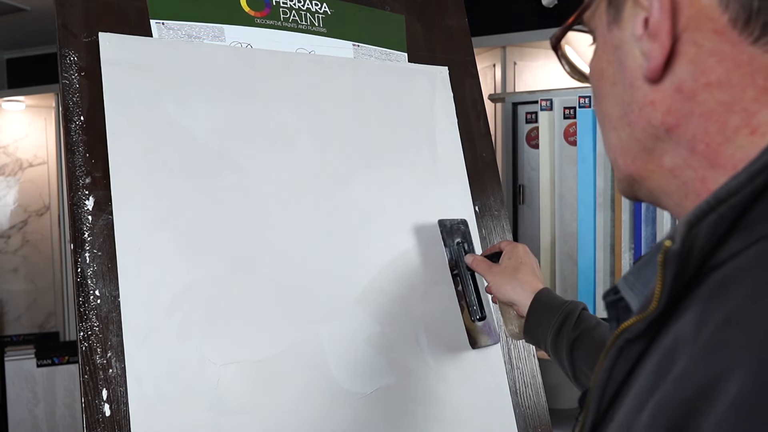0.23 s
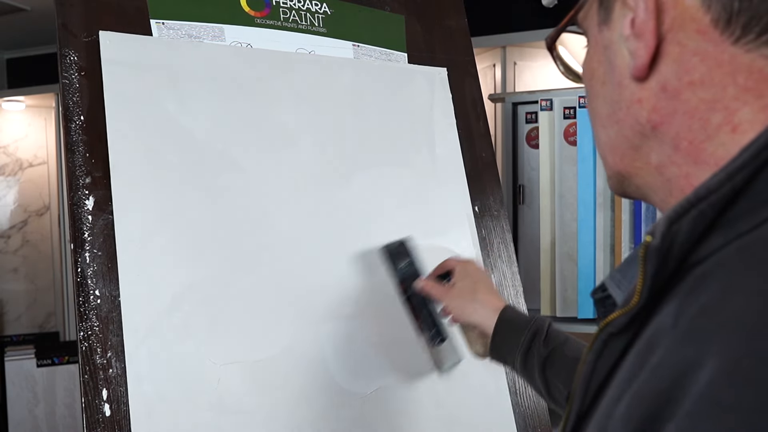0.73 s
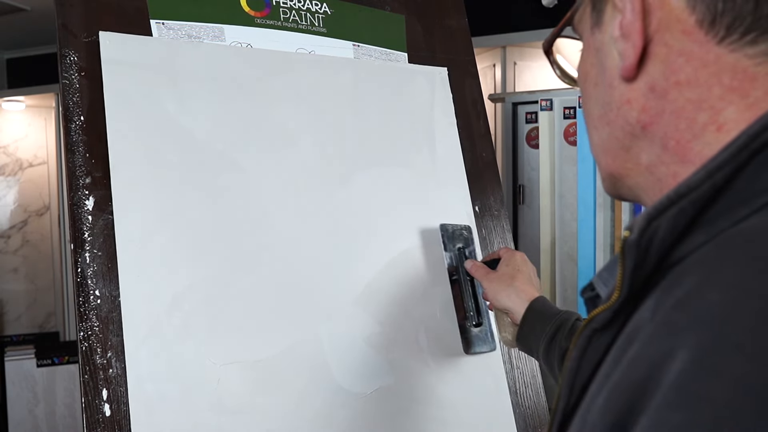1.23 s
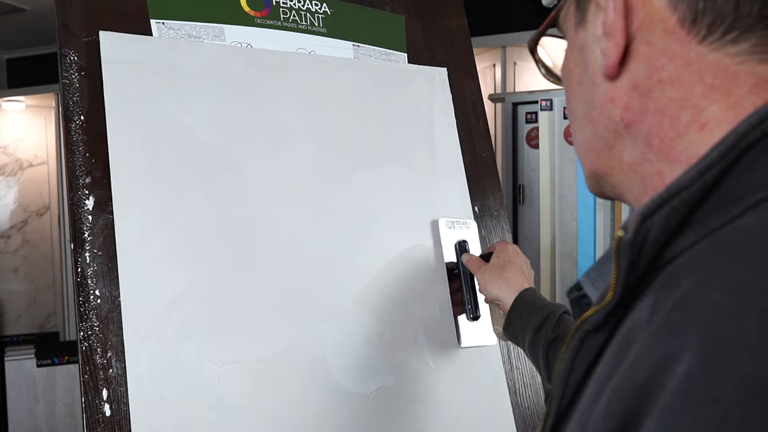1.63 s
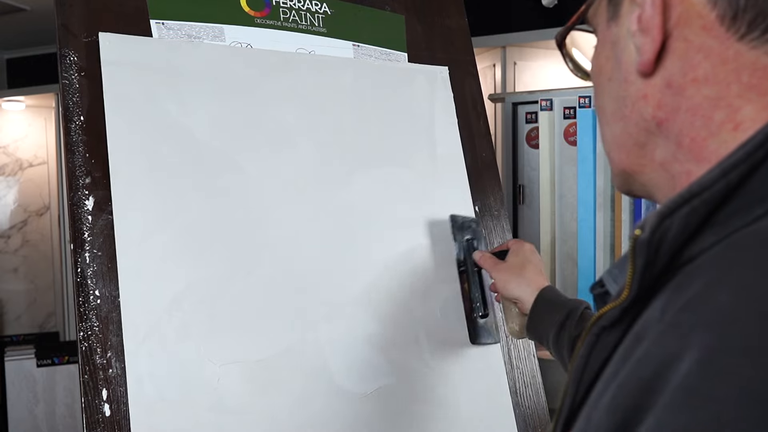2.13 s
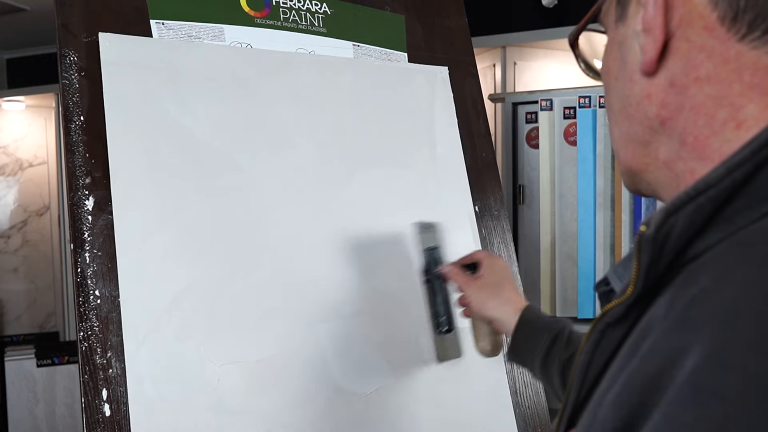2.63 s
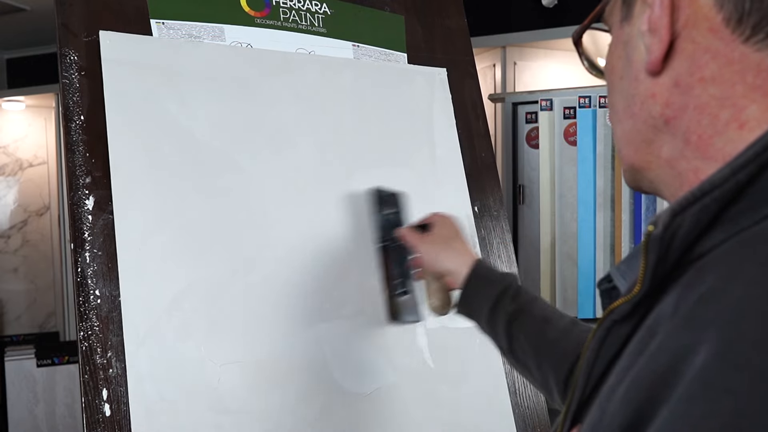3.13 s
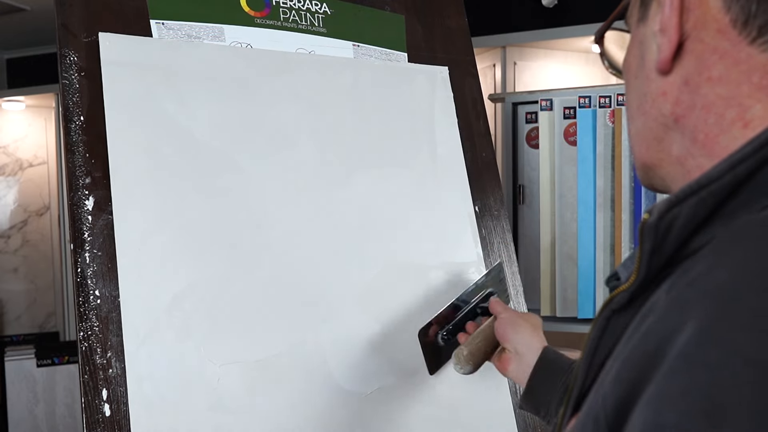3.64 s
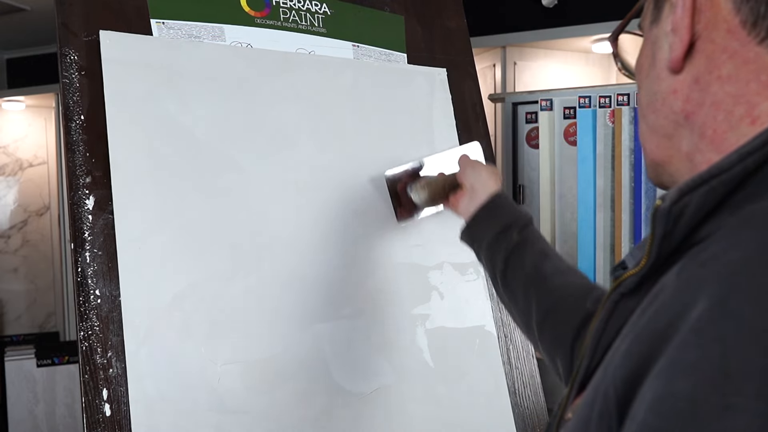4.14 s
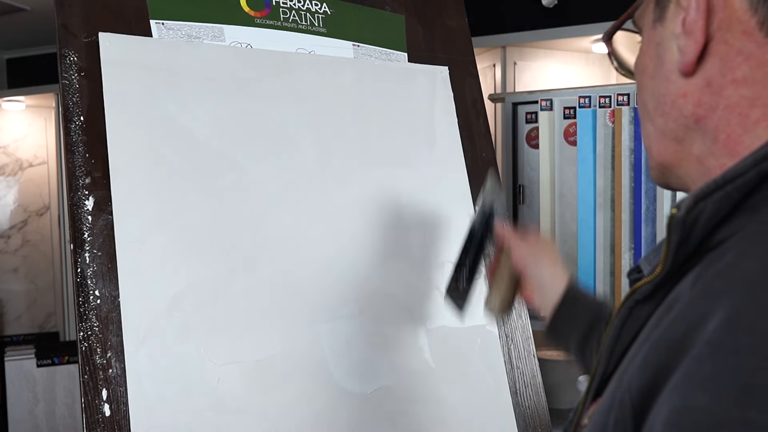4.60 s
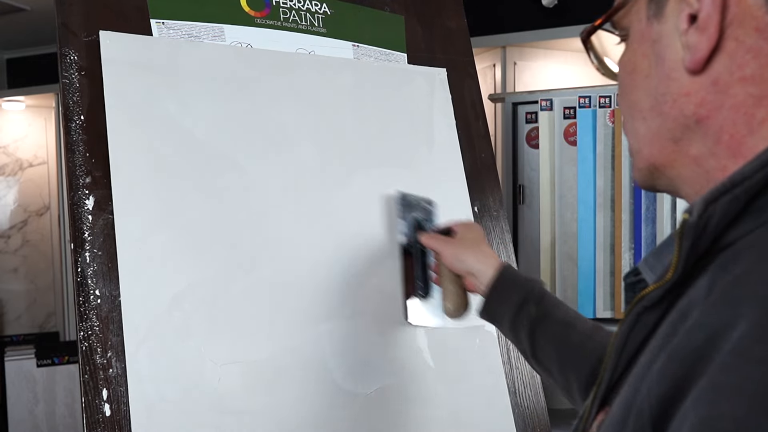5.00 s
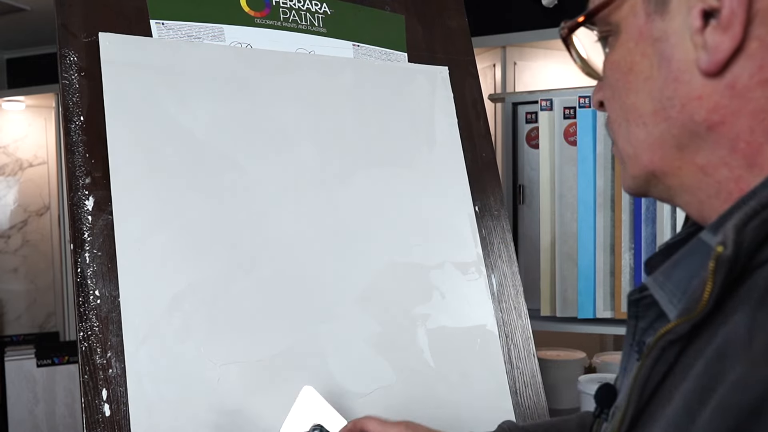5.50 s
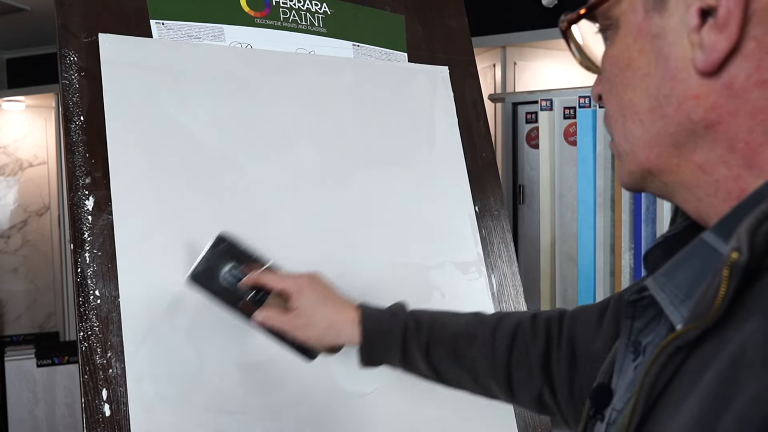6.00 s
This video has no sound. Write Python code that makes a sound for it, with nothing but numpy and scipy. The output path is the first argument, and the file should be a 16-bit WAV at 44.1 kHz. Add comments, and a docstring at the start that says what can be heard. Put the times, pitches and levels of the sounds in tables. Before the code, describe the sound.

Short gritty scrapes and soft hissing slides of a metal trowel spreading paint on a board, with small taps between strokes.

```python
"""A small, quiet workroom: a steel trowel spreads a thin coat of paint over a board on an easel.
The blade lands with a clack, hisses over wet paint and drags dully on the board. Where its edge
bites into the coat it sticks and slips in a gritty rasp. Tacky paint snaps off it in tiny ticks,
and once it slips off the board and rings. Strokes leave a short room tail over a low rumble."""
import sys
import numpy as np
from scipy import signal
from scipy.fft import rfft, irfft
from scipy.io import wavfile

SR = 44100
rng = np.random.default_rng(int(sys.argv[2]) if len(sys.argv) > 2 else 0)


def inscribe(sig):
    """Save sig as 16-bit PCM at rate SR to the path in sys.argv[1].

    A 1-D sig is mono; a 2-D sig holds one channel per row.
    Samples are clipped to [-1, 1] before scaling.
    """
    pcm = np.round(np.clip(np.atleast_2d(sig).T, -1, 1) * 32767)
    wavfile.write(sys.argv[1], SR, pcm.astype(np.int16))


N = 275889

# tone of the heavy board rocking on its easel: (frequency [Hz], level [dB])
ROCKING_TONE = [(20, -10), (45, 1), (100, -9), (200, -16.5), (400, -14), (650, -14), (2000, -35.5)]
# resonances of the board on its easel: (frequency [Hz], width [Hz], boost [dB])
ROCKING_MODES = [(48.5, 8.3, 3.5), (79, 16, 6), (142.9, 34, 4), (356, 33, 3.5)]


def from_db(db):
    """Decibels to gain."""
    return 10 ** (np.asarray(db) / 20)


def rms_one(x):
    """Scale to rms 1."""
    return x / np.sqrt(np.mean(x ** 2) + 1e-20)


def at_hz(points, hz):
    """Read a curve on a log-frequency axis."""
    points = np.array(points)
    return np.interp(np.log(np.maximum(hz, 1)), np.log(points[:, 0]), points[:, 1])


def drift(rate_hz):
    """Random modulator, gliding to a new value rate_hz times a second."""
    knots = rng.standard_normal(N // 10)
    return np.interp(np.arange(N) / SR * rate_hz, np.arange(len(knots)), knots)


def colour(x, tone, peaks=(), size=4096):
    """Minimum-phase EQ of unit power gain: a tone curve plus resonant peaks."""
    hz = np.fft.rfftfreq(size, 1 / SR)
    peaks_db = sum(db / (1 + (2 * (hz - f) / width) ** 2) for f, width, db in peaks)
    cepstrum = irfft(np.log(from_db(at_hz(tone, hz) + peaks_db)))
    cepstrum[size // 2:] = 0
    response = irfft(np.exp(2 * rfft(cepstrum) - cepstrum[0]))
    return signal.fftconvolve(x, response / np.linalg.norm(response))[:len(x)]


def add(track, sound, at_s):
    """Mix a sound in at a time."""
    start = int(at_s * SR)
    track[start:start + len(sound)] += sound[:N - start]


def room_tone(air_db=-51, hum_db=-56.5, mains_hz=50):
    """A steady bed of low rumble, faint hiss and mains hum."""
    # rumble and hiss of the room: (frequency [Hz], level [dB])
    air_tone = [(12, -22), (20, 7), (60, -11.5), (210, -10), (328, -22.5), (422, -21), (542, -20.5),
                (607, -25.5), (849, -22), (949, -28.5), (1370, -25), (3250, -34.5), (3530, -38.5),
                (3840, -37), (16000, -44.5)]
    air = colour(rng.standard_normal(N + SR), air_tone)[SR:]
    hum = np.sqrt(2) * np.sin(2 * np.pi * mains_hz * np.arange(N) / SR)
    return from_db(air_db) * air + from_db(hum_db) * hum


def ringing(modes, count, favoured_db=0, scatter_db=3.5):
    """Struck modes die away, each blow sharing its force among them a little differently."""
    hz, mode_db, t60 = np.transpose(modes)
    t = np.arange(count) / SR
    gains = from_db(mode_db + favoured_db + rng.normal(0, scatter_db, len(hz)))
    gains *= rng.choice([-1, 1], len(hz))
    decays = np.exp(-np.log(1000) * np.outer(1 / t60, t))
    return gains @ (np.sin(2 * np.pi * np.outer(hz, t)) * decays)


def landings(clack_trim_db=-8.5, crack_trim_db=-3.0, crack_s=0.0046, thump_s=0.024):
    """Steel meets board, and once the stand knocks: a bright crack, a dense clack, a few ringing modes and a
    low thump."""
    # blade hits, and at 3.748 s a knock of the stand: (time [s], force [dB], clack focus [Hz], clack decay [s],
    # crack before trim [dB],
    hits = [(0.2022, -19.5, 2420, 0.012, -27.5, 600, -23.5), (0.494, -43, 1570, 0.0051, -75, 930, -49.5),
            (1.06, -29.5, 1920, 0.0046, -60, 1030, -47.5), (1.307, -59, 1100, .005, -70, 447, -55),
            (2.16, -23, 2090, 0.0048, -66, 880, -42), (2.18, -20, 1840, .0032, -46, 456, -36),
            (2.205, -32, 1650, 0.0021, -61, 960, -33), (2.306, -32.5, 2290, 0.0052, -39, 719, -43),
            (2.717, -37, 2050, 0.0077, -53, 441, -74), (2.873, -16, 1710, 0.0069, -34.5, 744, -31),
            (3.703, -9.5, 1930, 0.0024, -26, 920, -22), (3.742, -6.5, 2210, 0.0021, -23.5, 400, -30.5),
            (3.748, -21, 1530, 0.0076, -29, 390, -20), (4.403, -27.5, 1370, 0.0015, -53, 746, -35),
            (4.786, -13, 1390, 0.0058, -23.5, 1050, -21), (4.792, -16.5, 1600, 0.0037, -27, 1090, -29),
            (5.76, -9, 1330, .01, -24, 915, -31), (5.785, -15, 1610, 0.0039, -21.5, 1100, -19),
            (5.792, -13.5, 1600, 0.0054, -23, 980, -39)]
    # the board's crowd of quickly damped modes: (frequency [Hz], level [dB])
    clack_tone = [(150, -38.5), (330, -5), (580, -6.5), (750, -29.5), (1100, -5.5), (1600, 7), (2200, 8.5),
                  (2700, -1), (3500, -11.5), (6000, -34)]
    # the board's ringing modes: (frequency [Hz], level [dB], t60 [s])
    board_modes = [(415, -11.5, 0.044), (723, -6, 0.094), (948, 2, 0.043), (1140, -3.5, 0.083),
                   (1180, 6.5, 0.029), (1396, -4, 0.12), (1587, -12.5, 0.075), (2046, -9, 0.14),
                   (2320, 15, 0.0074), (2430, 6.5, 0.01), (3250, -18, 0.046)]
    # steel on a hard coat: (frequency [Hz], level [dB])
    crack_tone = [(500, -46.5), (2000, 14), (3500, 9), (5000, 3.5), (7000, 3), (10000, -2), (15000, -11)]
    firm_force_db, firm_thump_db, hand_weight_db = -10.5, -33.0, -44.5
    out, t = np.zeros(N), np.arange(SR // 2) / SR
    mode_hz = np.transpose(board_modes)[0]
    for at_s, force_db, clack_hz, clack_s, crack_db, ring_hz, ring_db in hits:
        decays = np.exp(-t / np.array([[clack_s], [crack_s], [thump_s]]))
        clack_burst, crack_burst, thump_burst = rng.choice([-1, 1], decays.shape) * decays
        # where the blow falls decides which resonances speak
        clack = colour(clack_burst, clack_tone, peaks=[(clack_hz, 350, 10.0)])
        focus_db = 10.5 * np.exp(-(np.log2(mode_hz / ring_hz) / 0.29) ** 2)
        ring = ringing(board_modes, len(t), favoured_db=focus_db)
        crack = colour(crack_burst, crack_tone)
        layers = (clack, force_db + clack_trim_db), (ring, ring_db), (crack, crack_db + crack_trim_db)
        for layer, db in layers:
            add(out, layer / np.std(layer[:SR // 200]) * from_db(db), at_s)  # level of the first 5 ms
        # even the lightest touch thumps with the weight of the hand
        thump_db = max(firm_thump_db + 1.05 * (force_db - firm_force_db), hand_weight_db)
        add(out, colour(thump_burst, ROCKING_TONE, ROCKING_MODES) * from_db(thump_db), at_s)
    return out


def reflections(build_s=0.0014):
    """Diffuse echoes of one spot in the room build up and die away, sooner in the treble."""
    # room decay: (frequency [Hz], t60 [s])
    decay_times = [(200, 1), (1600, 0.58), (6000, 0.61), (9000, 0.32), (15000, 0.34)]
    # colour of the echoes: (frequency [Hz], level [dB])
    echo_tone = [(300, 3.0), (1800, -4.0), (3500, -2.5), (7000, 7.5), (14000, -4.5)]
    t, edges = np.arange(SR) / SR, np.geomspace(80, 18000, 11)
    white, tail = rng.standard_normal((2, SR)), 0
    for k, (low, high) in enumerate(zip(edges, edges[1:])):
        band = signal.sosfilt(signal.butter(2, [low, high], "band", fs=SR, output="sos"), white[k % 2])
        hz = np.sqrt(low * high)
        decay = np.exp(-np.log(1000) * t / at_hz(decay_times, hz))
        tail += from_db(at_hz(echo_tone, hz)) * band * decay
    tail *= 1 - np.exp(-(t / build_s) ** 2)
    return tail / np.linalg.norm(tail)


def room_tail(x, wet_db=-8.0, travel_hz=1.7):
    """Two echo patterns crossfade as the trowel travels over the board."""
    place = 2 * np.pi * travel_hz * np.arange(N) / SR
    sends = x * np.cos(place), x * np.sin(place)
    return from_db(wet_db) * sum(signal.fftconvolve(send, reflections())[:N] for send in sends)


def paint_ticks(trim_db=-3.5, decay_s=0.0013):
    """Tacky paint snaps off the blade's edge in tiny bright ticks, and the first landing carries a bright tick
    of its own."""
    # snaps of paint, and at 0.203 s the first landing's bright tick: (time [s], level before trim [dB])
    snaps = [(0.203, -26), (0.9504, -43), (1.1174, -53), (1.5254, -33), (2.719, -39.5), (3.479, -44),
             (4.4007, -25), (4.4054, -19.5)]
    out, t = np.zeros(N), np.arange(SR // 20) / SR
    for at_s, db in snaps:
        add(out, rng.standard_normal(len(t)) * np.exp(-t / decay_s) * from_db(db + trim_db), at_s)
    return colour(out, tone=[(2000, -18.0), (6000, -2.5), (11000, 4), (16000, 6)])


def push(start, length, swell_db, attack_s, release_s):
    """Envelope of one push of the hand: it builds, swells or sags evenly, then lets go."""
    t = np.arange(N) / SR - start
    flanks = np.minimum(t, 0) / attack_s - np.maximum(t - length, 0) / release_s
    return from_db(swell_db * (np.clip(t / length, 0, 1) - .5)) * np.exp(np.maximum(flanks, -20))


def strokes(tremor_db=.8, tremor_hz=35):
    """Glides and bites sum to level curves for rasp, drag, hiss and grit, and the rasp's pitch."""
    # the flat blade slides on wet paint: (start [s], length [s], hiss [dB], drag [dB], swell [dB])
    glides = [(0.335, 0.048, -67, -80, -6), (0.472, 0.011, -69, -66, -3), (0.635, 0.054, -52, -63, 18),
              (0.682, 0.1, -40.5, -37, 16), (1.202, .27, -57, -62.5, -5), (1.511, 0.027, -52.5, -53, 2),
              (1.56, 0.094, -64, -63, 3), (1.697, 0.17, -40, -47.5, 9), (2.291, 0.12, -40, -43, 12.5),
              (2.413, 0.047, -41, -47, 2), (2.468, .016, -29.5, -33, -11), (2.951, 0.19, -46.5, -44, 4),
              (3.159, 0.087, -36.5, -53, 0), (3.802, 0.44, -50, -40, -6), (4.234, 0.11, -48, -34, 9),
              (4.563, 0.1, -65, -70, 0), (4.85, 0.45, -47, -50, -6.5), (5.497, 0.0096, -62, -56, -1),
              (5.583, 0.018, -66.5, -75, 0), (5.81, 0.19, -46.5, -37.5, -8), (5.996, 0.24, -54, -49, 2)]
    # the tilted edge bites: (start [s], length [s], rasp [dB], swell [dB], attack [s], pitch [Hz],
    # grit relative to rasp [dB])
    bites = [(0.708, 0.081, -21, 4.5, 0.013, 1890, -15), (1.202, 0.11, -61.5, -1, 0.014, 2430, -2),
             (1.77, 0.03, -24, 9, 0.0043, 2060, -17), (1.841, 0.029, -20, 0.5, 0.023, 1670, -15.5),
             (2.378, 0.029, -35.5, 6.5, 0.014, 2160, -7), (2.472, 0.045, -21.5, -5.5, 0.0087, 1880, -12.5),
             (2.998, 0.029, -28, 2, 0.011, 2110, -22), (3.047, 0.13, -26.5, 7, 0.01, 2000, -38),
             (3.185, 0.076, -19.5, -0.5, .026, 1900, -16), (3.265, 0.074, -31, -7, .01, 1900, -13.5),
             (3.878, 0.026, -37, 8, 0.014, 2200, -18), (3.951, 0.039, -36.5, 2, 0.014, 2150, -22),
             (4.249, 0.081, -36, 15, 0.012, 2000, -17), (4.883, 0.033, -32.5, 1, 0.014, 1840, -22),
             (4.958, 0.16, -32, 10.5, .018, 1870, -17), (5.12, 0.11, -19.5, 2, 0.031, 2130, -16),
             (5.567, 0.085, -67.5, 4, .015, 2100, -22), (5.862, 0.11, -25, 4.5, 0.022, 1650, -14),
             (5.997, 0.24, -36.5, -3.5, 0.016, 1730, -37)]
    rasp = drag = hiss = grit = weighted_pitch = 0
    for start, length, hiss_db, drag_db, swell_db in glides:
        envelope = push(start, length, swell_db, attack_s=0.011, release_s=0.012)
        hiss += (envelope * from_db(hiss_db)) ** 2
        drag += (envelope * from_db(drag_db)) ** 2
    for start, length, rasp_db, swell_db, attack_s, pitch_hz, grit_db in bites:
        power = (push(start, length, swell_db, attack_s, release_s=0.0098) * from_db(rasp_db)) ** 2
        rasp += power
        weighted_pitch += power * pitch_hz
        grit += power * from_db(grit_db) ** 2
    # a biting edge also drags on the board, following part of the rasp's swing
    full_bite_db, full_drag_db, follow = -20, -32, 0.57
    drag += from_db(full_drag_db) ** 2 * (rasp / from_db(full_bite_db) ** 2) ** follow
    rasp_db, drag_db, hiss_db, grit_db = 10 * np.log10([rasp, drag, hiss, grit])
    pressure_db = tremor_db * drift(tremor_hz)
    return rasp_db + pressure_db, drag_db + pressure_db, hiss_db, grit_db, weighted_pitch / rasp


def catches(per_s, spread_db):
    """The edge catches on specks at random moments, each with its own strength; rms 1."""
    sizes = from_db(spread_db * np.clip(rng.standard_normal(N), -2, 2)) * rng.choice([-1, 1], N)
    return rms_one(sizes * (rng.random(N) < per_s / SR))


def slips(per_s, jitter, decay_s):
    """Stick and slip: the blade lets go at uneven intervals and each slip dies quickly; rms 1."""
    cycles = np.cumsum(per_s * np.exp(jitter * drift(300))) / SR
    releases = np.diff(np.floor(cycles), prepend=0) * from_db(0.5 * rng.standard_normal(N))
    return rms_one(signal.lfilter([1], [1, -np.exp(-1 / (decay_s * SR))], releases))


def moving_peak(x, centre_hz, boost_db, width_hz):
    """A broad resonance that follows a moving pitch; rms 1."""
    hz, t, frames = signal.stft(x, SR, nperseg=512)
    centre = np.interp(t, np.arange(N) / SR, centre_hz)
    gain = from_db(boost_db * np.exp(-((hz[:, None] - centre) / width_hz) ** 2))
    return rms_one(signal.istft(frames * gain, SR)[1][:N])


def scraping(rasp_db, drag_db, hiss_db, grit_db, pitch_hz, slip_from_db=-18.0, grip=3.4, coat_db=1.3):
    """Four layers of friction, each a stream of tiny catches, flutter over the uneven coat."""
    # the edge biting into the coat: (frequency [Hz], level [dB])
    rasp_tone = [(180, -104), (300, -41), (379, -35.5), (656, -24), (915, -9), (1120, -10), (1510, -0.5),
                 (1870, -2), (2360, -6), (3190, -14), (4750, -25), (6100, -26.5), (7570, -30), (14000, -46),
                 (16000, -50)]
    # the blade dragging on the board: (frequency [Hz], level [dB])
    drag_tone = [(88, -20), (150, -23.5), (174, -21.5), (235, -15), (362, -9), (400, 0), (649, -4.5),
                 (846, 3.5), (983, 2), (1180, 7), (2110, 5), (3150, -11), (8000, -46), (10400, -96),
                 (17600, -120)]
    # steel sliding on wet paint: (frequency [Hz], level [dB])
    hiss_tone = [(1470, -74), (2500, 5), (3230, -1.5), (4950, -5.5), (6060, 2.5), (7650, -1), (9730, 1),
                 (11100, 0.5), (14700, 1), (16000, -6.5)]
    # grit ground under the edge: (frequency [Hz], level [dB])
    grit_tone = [(2000, -31), (3800, -0.5), (6000, 2), (8000, -5.5), (11000, -11.5), (16000, -16)]
    # flexing modes of the hand-held blade: (frequency [Hz], width [Hz], boost [dB])
    blade_modes = [(1725, 66, 2), (1793, 40, -1.5), (2053, 47, 6.5), (2260, 92, 2.5), (3620, 300, 3.5),
                   (6600, 520, 3.5)]
    # a lightly held blade glides; once the edge bites, it sticks and slips
    sticking = .75 / (1 + np.exp((slip_from_db - rasp_db) / 4))
    judder = 1 - sticking + sticking * slips(per_s=270, jitter=.35, decay_s=.0018)
    rasp = colour(catches(per_s=16000, spread_db=-1.0) * judder, rasp_tone, blade_modes)
    rasp = moving_peak(rasp, pitch_hz, boost_db=6.5, width_hz=780)
    # the edge can hold only so much force, so the strongest slips are about equal
    rasp = rms_one(np.tanh(rasp / grip))
    drag = colour(catches(per_s=4000, spread_db=0.5) * judder, drag_tone, blade_modes)
    hiss = colour(catches(per_s=19000, spread_db=6.0) * np.sqrt(judder), hiss_tone)
    grit = colour(catches(per_s=9000, spread_db=2.0) * np.sqrt(judder), grit_tone)
    flutter = from_db(coat_db * np.clip(drift(100), -1.5, 1.5))
    return flutter * (rasp * from_db(rasp_db) + drag * from_db(drag_db)
                      + hiss * from_db(hiss_db) + grit * from_db(grit_db))


def easel_rumble(rasp_db, drag_db, trim_db=-4.0, max_push_db=-43.0):
    """Board and easel rumble under a flat blade, less when it rides on its edge."""
    push_db = np.minimum(drag_db, max_push_db) - np.maximum(rasp_db - drag_db, 0)
    return colour(rng.standard_normal(N) * from_db(push_db + trim_db), ROCKING_TONE, ROCKING_MODES)


def blade_flick(attack_s=0.001):
    """The blade slips off the board's edge and rings freely for a moment."""
    # slipping off the edge: (time [s], level [dB])
    flicks = [(4.328, -40.5)]
    # the free blade's modes: (frequency [Hz], level [dB], t60 [s])
    free_modes = [(1007, -4, .2), (1260, 0, .2), (1545, -2, .25), (2196, -6, .35), (2939, -1, .15),
                  (2995, -3, .12), (3080, -5, .09), (3246, -3, .08), (3429, 0, .2), (3460, -5, .12),
                  (3817, -7, .11)]
    out, t = np.zeros(N), np.arange(SR // 2) / SR
    for at_s, db in flicks:
        add(out, ringing(free_modes, len(t)) * (1 - np.exp(-t / attack_s)) * from_db(db), at_s)
    return out


def scene():
    """The trowel on the board, with room tail and room tone, in mono."""
    rasp_db, drag_db, hiss_db, grit_db, pitch_hz = strokes()
    scrape = scraping(rasp_db, drag_db, hiss_db, grit_db, pitch_hz)
    trowel = scrape + landings() + blade_flick() + paint_ticks() + easel_rumble(rasp_db, drag_db)
    return (trowel + room_tail(trowel) + room_tone())[None]


def record(dry):
    """A steep low-pass takes off the very top."""
    cutoff_hz = 15900
    return signal.sosfilt(signal.ellip(10, .1, 80, cutoff_hz, fs=SR, output="sos"), dry)


dry = scene()
out = record(dry)
inscribe(out)
```